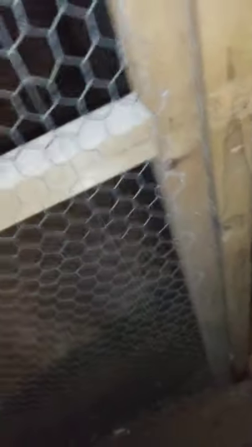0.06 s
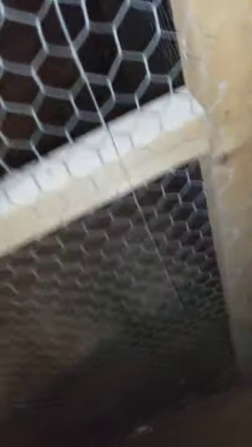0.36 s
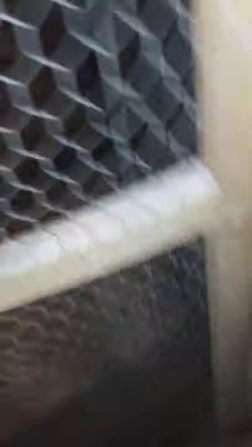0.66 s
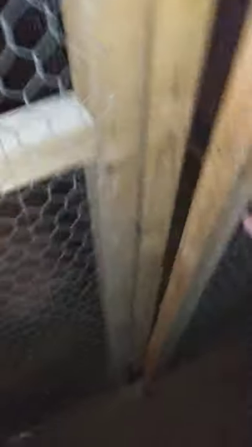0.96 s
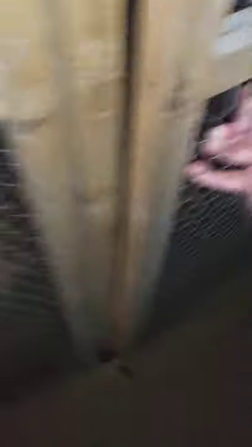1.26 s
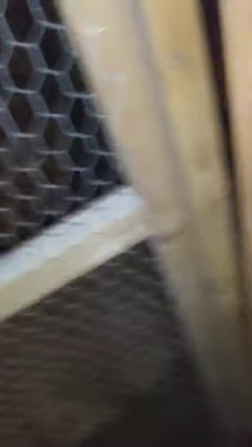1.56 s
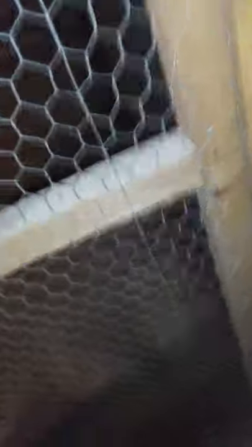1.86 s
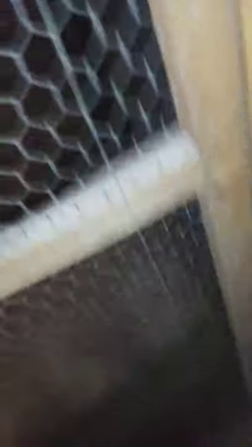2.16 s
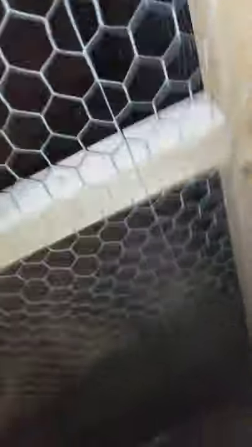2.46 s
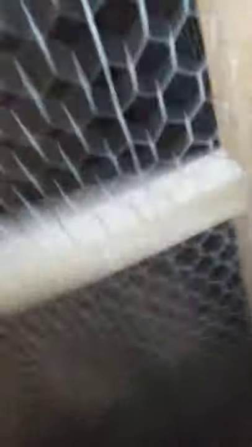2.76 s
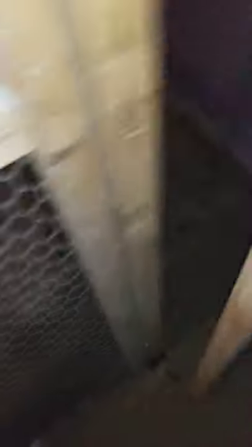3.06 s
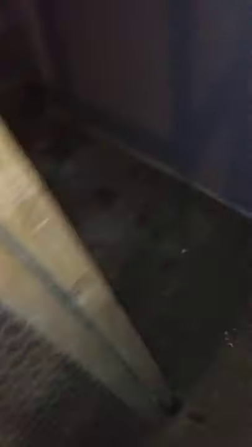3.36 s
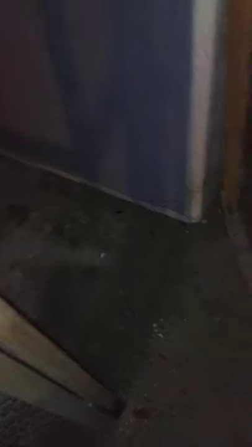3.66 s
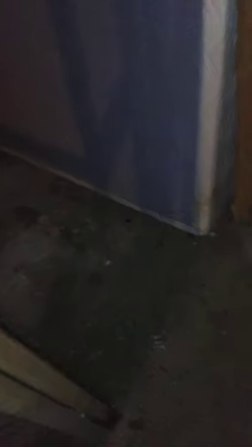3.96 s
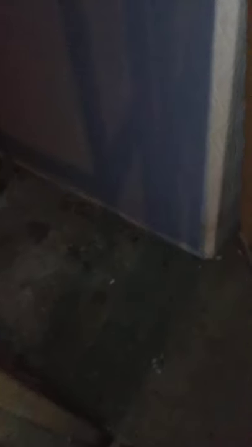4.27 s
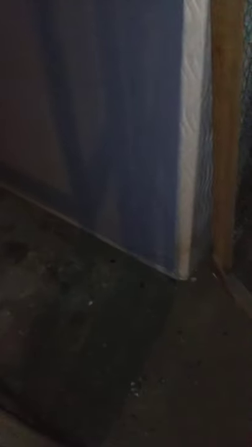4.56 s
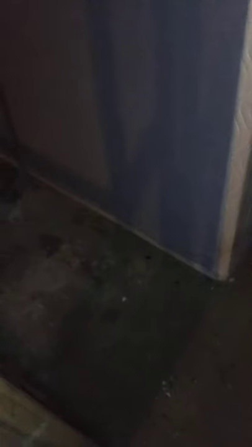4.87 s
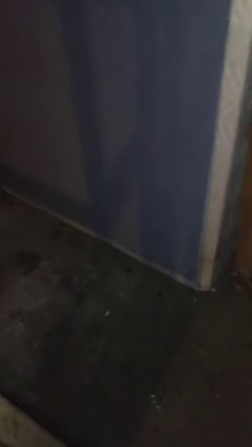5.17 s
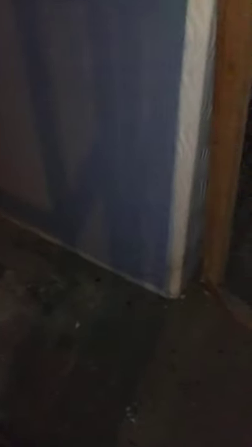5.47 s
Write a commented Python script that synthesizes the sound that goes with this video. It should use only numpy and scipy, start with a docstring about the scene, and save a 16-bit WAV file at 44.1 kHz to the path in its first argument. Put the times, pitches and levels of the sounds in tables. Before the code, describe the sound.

Wooden frames covered in wire mesh scrape, rattle and clack as they are shoved, then fingers softly rub and tap a small hollow case.

```python
"""Shifting wire-mesh frames

Wooden frames covered with wire mesh are shoved by hand in a bare storage room. The timber judders
in stick-slip as it scrapes, the mesh rattles and clacks against it, and wire ends tick, crinkle
and squeak. Afterwards fingers rub and tap a small hollow case, very close and nearly dry."""
import sys
import numpy as np
from scipy import signal
from scipy.fft import rfft, irfft, next_fast_len
from scipy.io import wavfile
from scipy.ndimage import map_coordinates

SR = 44100
rng = np.random.default_rng(int(sys.argv[2]) if len(sys.argv) > 2 else 0)


def generate_wav(signal):
    """Clip the signal to [-1, 1] and save it as 16-bit WAV at the path in sys.argv[1]."""
    frames = np.transpose(np.atleast_2d(signal))
    scaled = np.clip(frames, -1, 1) * 32767
    pcm = np.round(scaled).astype(np.int16)
    wavfile.write(sys.argv[1], SR, pcm)


N = 251811

# Table levels are relative: each layer sets its own gain.
# tone of the still room: freq_hz, level_db
AIR_TONE = [(15, -61), (25, -51), (137, -22.5), (170, -13.5), (200, -14.5), (299, -5.5), (392, -7),
            (461, -6), (637, -6), (905, -7), (1390, -10), (1820, -8), (15800, -28.5)]
# reverb time across the spectrum: freq_hz, t60_s
ROOM_DECAY = [(200, 1), (700, 0.56), (2000, 0.49), (5000, 0.11), (12000, 0.45)]

# tone of sliding skin (hiss and body) and of a tap's snap: freq_hz, level_db
SKIN_HISS_TONE = [(1700, -62.5), (3000, -19), (3900, -3), (4500, 5), (5400, -4), (6400, -3), (7500, -9.5),
                  (9000, -14.5), (15800, -27)]
SKIN_BODY_TONE = [(120, -43), (200, -34.5), (542, 0.5), (969, 1), (1060, 0.5), (1180, 3), (1450, -1),
                  (2080, 3.5), (2920, -11), (3200, -10), (4160, -43), (7040, -120)]
SNAP_TONE = [(1500, -26), (3200, -16), (4200, 8.5), (5300, -6), (6300, 3.5), (7800, -3.5), (9000, -11.5),
             (15500, -38)]
# the case rings high when rubbed, hollow when tapped: pitch_hz, level_db, t60_s
CASE_HIGH_MODES = [(4340, 5, 0.0093), (4580, 9, 0.013), (5200, -13, 0.014), (6040, -8.5, 0.013)]
CASE_HOLLOW_MODES = [(430, -11, .025), (560, -4, .026), (760, 0, .026), (1130, -2, .018), (1310, 1, .024),
                     (2050, -1, .015), (2600, -7, .01)]
# skin strokes the case: start_s, swell_s, fade_s, hiss_db, body_db
FINGER_STROKES = [(4.2, 0.049, 0.12, -56, -61), (4.42, 0.087, 0.13, -64.5, -64),
                  (4.94, 0.0064, 0.035, -36, -40.5), (4.95, 0.042, 0.073, -43, -50.5),
                  (5.055, 0.018, 0.032, -54, -59.5), (5.17, 0.058, .08, -55.5, -63.5),
                  (5.275, 0.0099, 0.13, -61, -57.5), (5.39, 0.083, 0.11, -51.5, -54),
                  (5.508, 0.024, 0.13, -44, -52.5), (5.62, 0.074, .15, -50, -55.5)]
# fingers tap the case: start_s, snap_db, snap_pitch_hz, thud_db
FINGER_TAPS = [(4.9383, -18, 5430, -28.5), (4.9405, -23, 3950, -40), (4.9415, -23.5, 6350, -18),
               (5.161, -45, 5300, -54), (5.2822, -31, 5290, -33.5), (5.2841, -29, 5240, -29.5),
               (5.452, -39, 4400, -36.5), (5.5032, -29, 4600, -25), (5.509, -28, 4400, -31.5)]

# tone of a contact on each part of a panel: freq_hz, level_db
TIMBER_TONE = [(60, -63), (130, -37), (185, -21), (250, -17.5), (330, -3), (480, -1), (900, -1.5),
               (1200, -5.5), (1800, -9.5), (4000, -73), (9000, -83)]
MESH_TONE = [(300, -48), (900, -3), (1400, -1.5), (1900, 4.5), (2300, 3), (2700, -1.5), (3300, -11.5),
             (6000, -47), (12000, -91)]
WIRE_TONE = [(1200, -31.5), (3100, -8.5), (3900, 2), (4600, 4), (5500, -3.5), (7000, -7), (8500, -18.5),
             (11000, -25), (15500, -31.5)]
# ring of the frame, the stretched mesh and the wire ends: pitch_hz, level_db, t60_s
TIMBER_RING = [(307, -7, .2), (369, -3, .26), (412, -7, .2), (445, -2, .24), (495, -2, .16), (546, -3, .18),
               (694, -1, .18), (721, -2, .22), (889, 4, .16), (966, 0, .17)]
MESH_RING = [(1437, -1, .12), (1588, 0, .08), (1734, 0, .11), (1820, 1, .07), (1954, 0, .07),
             (2242, 1, .09), (2581, 3, .06), (2796, 1, .13)]
WIRE_RING = [(3830, -14, 0.13), (4860, 1, 0.092), (5050, -1, .03), (5950, 4, 0.041), (6800, -1.5, 0.027)]
# wire slips over wire: start_s, length_s, low_pitch_hz, top_pitch_hz, level_db
WIRE_SQUEAKS = [(0.498, 0.075, 8600, 8760, -63), (2.365, 0.14, 7700, 9800, -61),
                (2.56, .105, 8000, 8840, -61)]
# fine wires spring back as the mesh is let go: start_s, level_db
CRINKLE_BURSTS = [(3.223, -52.5), (3.376, -49.5), (3.434, -56.5), (3.535, -52.5), (3.639, -64),
                  (3.791, -57)]
# soft bumps set a single batten humming: start_s, pitch_hz, level_db, t60_s
BATTEN_BUMPS = [(2.467, 411, -36.5, 0.23), (4.186, 810, -48, 0.2)]
# the hand shoves a frame: start_s, rise_s, hold_s, timber_db, mesh_db, wire_db
HAND_SHOVES = [(0, 0.0017, 0.011, -53, -59, -66), (.1, 0.022, 0.023, -45.5, -51.5, -61.5),
               (.18, 0.12, 0.026, -51, -50, -56), (.308, 0.0089, .1, -39.5, -36.5, -49),
               (.523, 0.0043, 0.036, -43, -45.5, -51.5), (.775, 0.013, 0.026, -49.5, -53.5, -63.5),
               (1.277, 0.0066, 0.0069, -46.5, -47, -53.5), (1.398, 0.01, .02, -35.5, -42, -68),
               (1.414, 0.029, 0.016, -33, -24, -38), (1.48, 0.032, 0.052, -41, -44, -48),
               (1.615, 0.0066, 0.05, -31, -28.5, -43), (1.788, 0.0067, 0.058, -35, -34.5, -44),
               (1.92, 0.014, 0.013, -43, -56, -53), (2.05, 0.014, 0.0041, -70, -56, -57),
               (2.115, 0.005, 0.0083, -49, -47.5, -52), (2.215, 0.0089, 0.026, -58, -51.5, -53),
               (2.304, 0.013, 0.061, -54.5, -51.5, -57.5), (2.4, 0.015, 0.12, -52.5, -49, -55.5),
               (2.55, 0.026, 0.266, -54.5, -53.5, -63.5), (2.598, 0.0048, 0.0075, -67, -50, -48),
               (2.838, 0.016, 0.015, -38, -33.5, -37), (2.958, .006, 0.05, -41, -35, -38),
               (3.12, 0.078, 0.11, -50.5, -43, -47), (3.362, 0.0062, 0.13, -50, -46, -47),
               (3.537, 0.0091, .005, -50.5, -49.5, -44), (3.57, 0.073, 0.035, -52, -44, -45.5),
               (3.783, 0.0057, 0.019, -51, -42.5, -40.5), (3.812, 0.0055, 0.015, -53, -42, -55),
               (4.14, 0.0068, 0.041, -65.5, -59, -65), (4.33, 0.1, 0.23, -67.5, -57.5, -65.5),
               (4.82, 0.14, 0.051, -61, -60, -62)]
# mesh and frame strike each other: start_s, mesh_db, timber_db, wire_db
FRAME_CLACKS = [(0.0912, -47, -47, -49.5), (0.3246, -18, -21, -30.5), (0.3618, -26.5, -42, -54),
                (0.5292, -28.5, -39, -47), (1.277, -24.5, -42, -44), (1.456, -21.5, -51, -28.5),
                (1.4692, -19, -21, -27), (1.6177, -24, -27, -34), (1.6522, -26, -49, -38),
                (1.6661, -30, -27.5, -42), (1.8254, -17.5, -27.5, -29), (2.3064, -30, -35.5, -43.5),
                (2.3518, -33, -37.5, -57), (2.3773, -35, -36.5, -51), (2.469, -40, -36, -55),
                (2.7618, -37.5, -40.5, -67), (2.8514, -28.5, -34, -31), (2.861, -23.5, -32.5, -31),
                (2.9078, -28.5, -34, -34), (2.9649, -30, -37, -43), (3.0035, -9.5, -29, -24),
                (3.2301, -42, -53, -37.5), (4.1868, -55, -42.5, -49.5)]


def amp(db):
    """Decibels to gain."""
    return 10 ** (np.asarray(db) / 20)


def unit(x):
    """Scale to rms 1."""
    return x / np.sqrt(np.mean(x ** 2) + 1e-20)


def unit_energy(x):
    """Scale an impulse response so that it keeps the power of noise."""
    return x / (np.linalg.norm(x) + 1e-20)


def along(points, hz):
    """Read a curve of (freq_hz, value) points on a log frequency axis."""
    freqs, values = np.transpose(points)
    return np.interp(np.log(hz + 1), np.log(freqs + 1), values)


def add(track, start_s, sound):
    """Mix a sound into the track."""
    start = max(round(start_s * SR), 0)
    piece = sound[:max(N - start, 0)]
    track[start:start + len(piece)] += piece


def through(x, response):
    """Pass x through an impulse response."""
    return signal.fftconvolve(x, response)[:N]


def drifting(x, responses):
    """Pass x through a row of impulse responses with equal-power crossfades."""
    place = np.linspace(0, len(responses) - 1, N)
    return sum(through(x * np.sqrt(np.clip(1 - abs(place - k), 0, 1)), response)
               for k, response in enumerate(responses))


def colour(tone, size=4096):
    """A tone curve as a minimum-phase EQ impulse response."""
    gain = amp(along(tone, np.fft.rfftfreq(size, 1 / SR)))
    cepstrum = irfft(np.log(gain))
    cepstrum[1:size // 2] *= 2
    cepstrum[size // 2 + 1:] = 0
    return unit_energy(irfft(np.exp(rfft(cepstrum))))


def ring(modes, scatter_db=0):
    """Damped sines, each struck harder or softer by a random scatter."""
    t = np.arange(SR // 3) / SR
    out = np.zeros(len(t))
    for k, (hz, db, t60) in enumerate(modes):
        decay = amp(db + scatter_db * rng.standard_normal() - 60 * t / t60)
        out += (-1) ** k * decay * np.sin(2 * np.pi * hz * t)
    return unit_energy(out)


def resonator(force, tone, modes, ring_db, positions=9):
    """A part answers at once, then rings on; its modes trade strength as the contact point moves."""
    direct = colour(tone)
    tails = [unit_energy(signal.fftconvolve(ring(modes, scatter_db=3), direct))
             for _ in range(positions)]
    return (through(force, direct) + amp(ring_db) * drifting(force, tails)) / np.hypot(1, amp(ring_db))


def stick_slip(rate_hz, spread_db, clump_db, smooth=1, clump_hz=55):
    """Friction force of rms 1: tiny jolts over smooth sliding noise, coming in short clumps."""
    sizes = amp(spread_db * np.clip(rng.standard_normal(N), -2, 2)) * rng.choice([-1, 1], N)
    jolts = sizes * (rng.random(N) < rate_hz / SR)
    grip_points = np.clip(rng.standard_normal(N // 100), -1.5, 1.5)
    grip = map_coordinates(grip_points, [np.arange(N) * clump_hz / SR])
    return unit((unit(jolts) + smooth * rng.standard_normal(N)) * amp(clump_db * grip))


def impact(t60_s, chatter):
    """Force of one hit: a spike and the chatter that dies after it."""
    t = np.arange(SR // 8) / SR
    force = chatter * unit_energy(rng.standard_normal(len(t)) * amp(-60 * t / t60_s))
    force[0] += 1
    return unit_energy(force)


def envelopes(gestures, shape):
    """Overlapping gestures add in power: one envelope for each level column."""
    power = sum(np.outer(amp(levels), shape(start, rise, length)) ** 2
                for start, rise, length, *levels in gestures)
    return np.sqrt(power)


def room_tone(level_db=-64):
    """Still air: a faint, steady bed of dark noise."""
    return amp(level_db) * unit(through(rng.standard_normal(N), colour(AIR_TONE)))


def room_tail(build_up_s=0.016):
    """One diffuse tail of the bare room; the lows hang on longest."""
    hz, t, bands = signal.stft(rng.standard_normal(SR * 3 // 4), SR, nperseg=256)
    decay = amp(-60 * t / along(ROOM_DECAY, hz)[:, None])
    tail = signal.istft(bands * decay, SR, nperseg=256)[1]
    build_up = 1 - np.exp(-np.arange(len(tail)) / SR / build_up_s)
    return unit_energy(tail * build_up)


def room_reverb(send, positions=8):
    """The room's answer changes as the panels move."""
    return drifting(send, [room_tail() for _ in range(positions)])


def stroke(start_s, swell_s, fade_s, fade_db=24.5):
    """Pressure of one finger stroke: it swells, then is down by fade_db after fade_s."""
    t = np.arange(N) / SR - start_s
    swell = np.clip(t / swell_s, 0, 1) ** 0.92
    fading = np.clip((t - swell_s) / fade_s, 0, 4)
    return swell * amp(-fade_db * fading ** 2)


def finger_rubs():
    """Skin slides softly over the case and makes it sing faintly."""
    hiss, body = envelopes(FINGER_STROKES, stroke)
    hiss *= stick_slip(rate_hz=1300, spread_db=3.5, clump_db=2.5)
    bright = resonator(hiss, SKIN_HISS_TONE, CASE_HIGH_MODES, ring_db=-12.5)
    body *= stick_slip(rate_hz=1400, spread_db=0.5, clump_db=2)
    return bright + through(body, colour(SKIN_BODY_TONE))


def finger_taps():
    """Dry taps on the case: a short ping, a bright snap and a hollow thud."""
    out = np.zeros(N)
    for start_s, snap_db, snap_hz, thud_db in FINGER_TAPS:
        ping = ring([(snap_hz, 0, 0.009)])
        snap = through(impact(t60_s=0.018, chatter=3.8), colour(SNAP_TONE))
        thud = ring(CASE_HOLLOW_MODES, scatter_db=4)
        add(out, start_s, amp(snap_db + 13) * ping)
        add(out, start_s, amp(snap_db + 11) * snap)
        add(out, start_s, amp(thud_db + 15.5) * thud)
    # the small case radiates little bass
    return signal.sosfilt(signal.butter(6, 420, "highpass", fs=SR, output="sos"), out)


def wire_squeaks(flutter_hz=750):
    """Wire on wire: a thin, rough whistle that rises and falls with the speed of the slip."""
    out, t = np.zeros(N), np.arange(N) / SR
    lowpass = signal.butter(2, flutter_hz, fs=SR, output="sos")
    for start_s, length_s, low_hz, top_hz, db in WIRE_SQUEAKS:
        speed = np.sin(np.pi * np.clip((t - start_s) / length_s, 0, 1))
        flutter = unit(signal.sosfilt(lowpass, rng.standard_normal(N)))
        pitch_hz = low_hz + (top_hz - low_hz) * speed ** 2
        out += amp(db) * speed * flutter * np.sin(2 * np.pi * np.cumsum(pitch_hz) / SR)
    return out


def wire_crinkle(count=650, pitch_hz=7500, spread=0.183, t60_s=0.006, rise_s=0.0083, fall_db_per_s=280):
    """Fine wires spring back in bursts of crackle, each tick at its own pitch and strength."""
    crackle, t = np.zeros(N), np.arange(SR // 100) / SR
    times = rng.uniform(CRINKLE_BURSTS[0][0], CRINKLE_BURSTS[-1][0] + 0.2, count)
    attack = 1 - np.exp(-t / 0.0002)
    for start_s, (detune, size) in zip(times, np.clip(rng.standard_normal((count, 2)), -2, 2)):
        tick = np.sin(2 * np.pi * pitch_hz * np.exp(spread * detune) * t)
        add(crackle, start_s, attack * amp(5 * size - 60 * t / t60_s) * tick)
    bursts, age = np.zeros(N), np.arange(SR // 4) / SR
    for start_s, db in CRINKLE_BURSTS:
        add(bursts, start_s, np.minimum(age / rise_s, 1) * amp(db - fall_db_per_s * age))
    return amp(-5.5) * bursts * unit(crackle)


def batten_bumps(rise_s=0.0017):
    """A soft contact wakes only one low mode of the timber."""
    out, t = np.zeros(N), np.arange(SR // 3) / SR
    attack = 1 - np.exp(-t / rise_s)
    for start_s, hz, db, t60 in BATTEN_BUMPS:
        add(out, start_s, attack * amp(db - 60 * t / t60) * np.sin(2 * np.pi * hz * t))
    return out


def panel(on_timber, on_mesh, on_wire):
    """A panel under three forces: woody lows, metallic mids and bright wire ends."""
    return (resonator(on_timber, TIMBER_TONE, TIMBER_RING, ring_db=-6.5)
            + resonator(on_mesh, MESH_TONE, MESH_RING, ring_db=-14)
            + resonator(on_wire, WIRE_TONE, WIRE_RING, ring_db=-20))


def shove(start_s, rise_s, hold_s, drop_db=4.5, drop_s=0.023, settle_db_per_s=82.5):
    """One shove builds and holds; let go, the rattle drops at once, then settles more slowly."""
    t = np.arange(N) / SR - start_s
    released_s = np.maximum(t - rise_s - hold_s, 0)
    release_db = drop_db * (1 - np.exp(-released_s / drop_s)) + settle_db_per_s * released_s
    return np.clip(t / rise_s, 0, 1) * amp(-release_db)


def frame_scrapes():
    """The frame judders along; the mesh buzzes on it and its wires scratch."""
    timber, mesh, wire = envelopes(HAND_SHOVES, shove)
    return panel(amp(-0.5) * timber * stick_slip(rate_hz=700, spread_db=0.5, clump_db=1, smooth=0.68),
                 amp(-2.5) * mesh * stick_slip(rate_hz=400, spread_db=0, clump_db=3),
                 amp(-1) * wire * stick_slip(rate_hz=410, spread_db=1.5, clump_db=2.5))


def frame_clacks():
    """Mesh strikes frame: each knock shakes timber, mesh and wire ends together."""
    timber, mesh, wire = np.zeros((3, N))
    for start_s, mesh_db, timber_db, wire_db in FRAME_CLACKS:
        add(timber, start_s, amp(timber_db + 18.5) * impact(t60_s=0.032, chatter=0.9))
        add(mesh, start_s, amp(mesh_db + 17.5) * impact(t60_s=0.047, chatter=1.0))
        add(wire, start_s, amp(wire_db + 20) * impact(t60_s=0.014, chatter=4.6))
    return panel(timber, mesh, wire)


def scene():
    """Mono mix: panels at arm's length in the room, fingers close and nearly dry, over room tone."""
    scrapes = frame_scrapes() + wire_crinkle()
    clacks, taps = frame_clacks(), finger_taps()
    reverb = room_reverb(amp(-12) * scrapes + amp(-10.5) * clacks + amp(-23) * taps)
    background = room_tone() + reverb
    details = batten_bumps() + wire_squeaks() + finger_rubs()
    return (background + details + taps + scrapes + clacks)[None]


def record(dry, top_hz=15850):
    """A brick-wall high cut on the whole mix."""
    size = next_fast_len(N + SR // 2)
    passband = np.fft.rfftfreq(size, 1 / SR) < top_hz
    return irfft(rfft(dry, size) * passband, size)[..., :N]


dry = scene()
out = record(dry)
generate_wav(out)
```